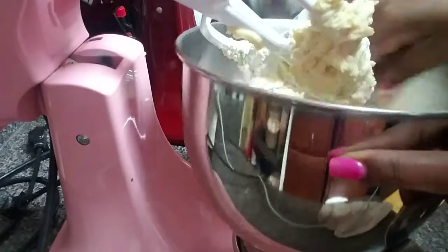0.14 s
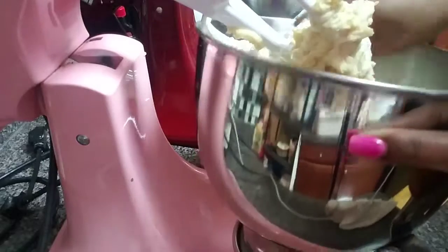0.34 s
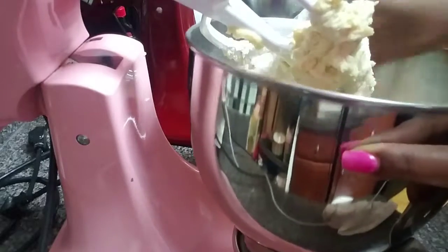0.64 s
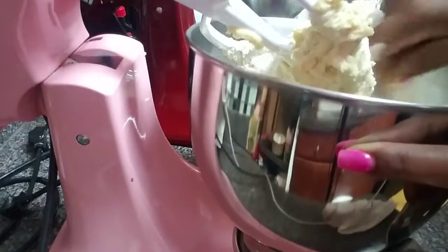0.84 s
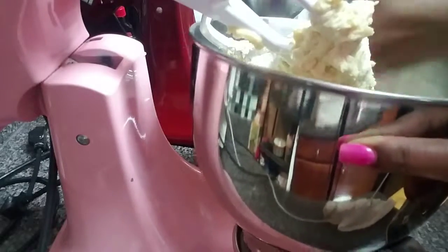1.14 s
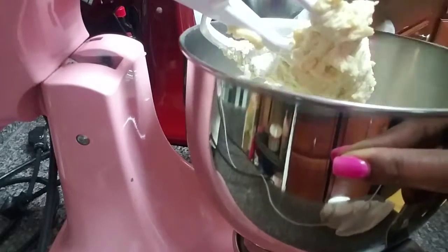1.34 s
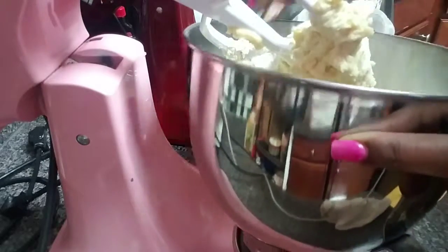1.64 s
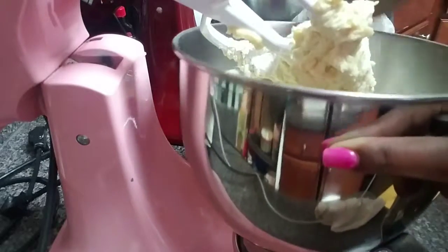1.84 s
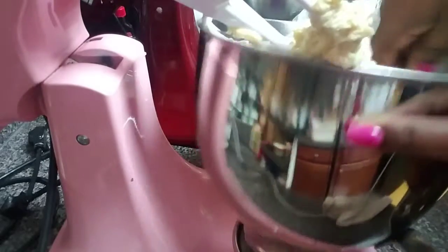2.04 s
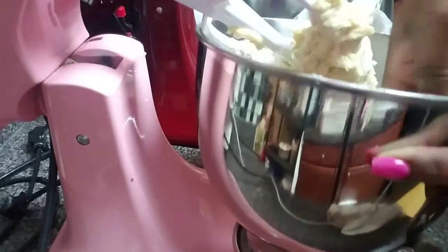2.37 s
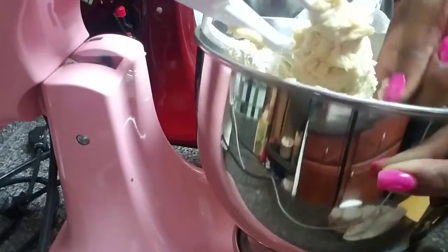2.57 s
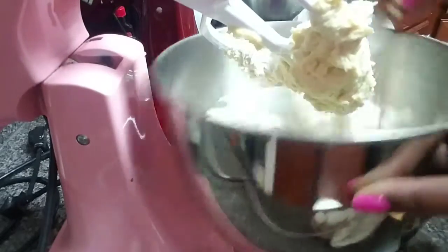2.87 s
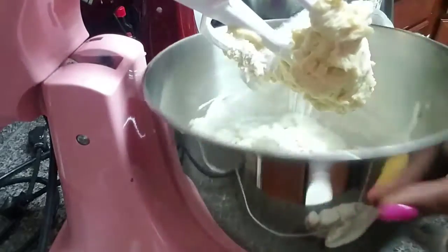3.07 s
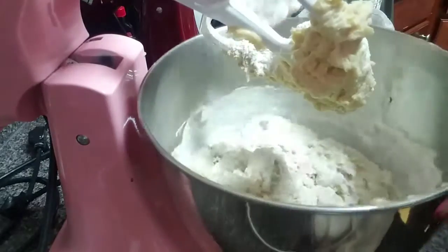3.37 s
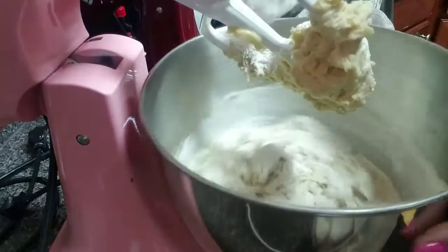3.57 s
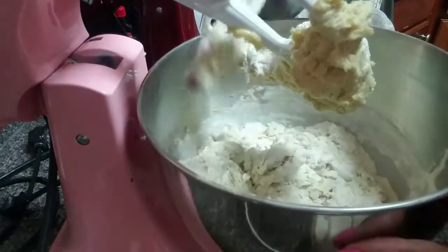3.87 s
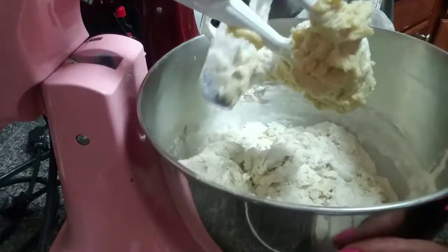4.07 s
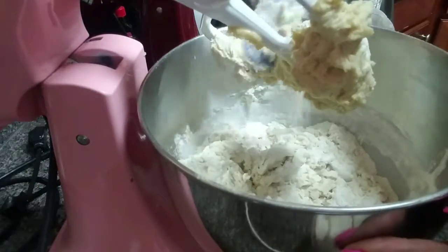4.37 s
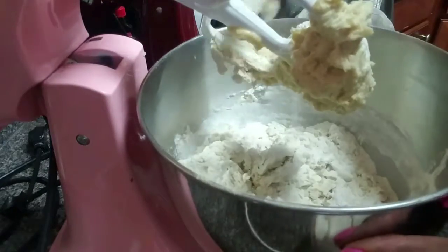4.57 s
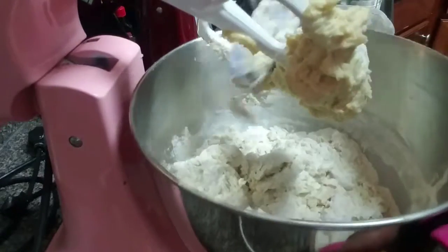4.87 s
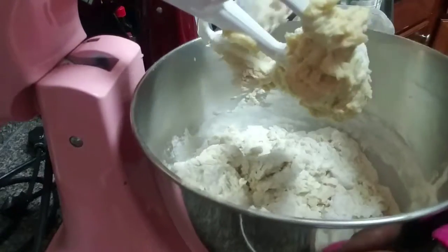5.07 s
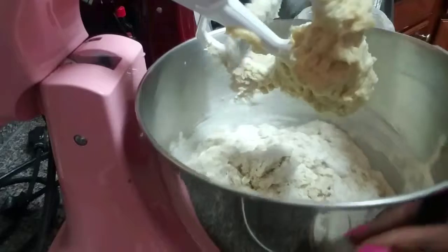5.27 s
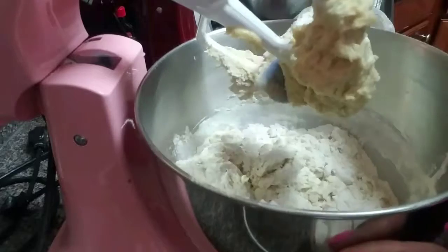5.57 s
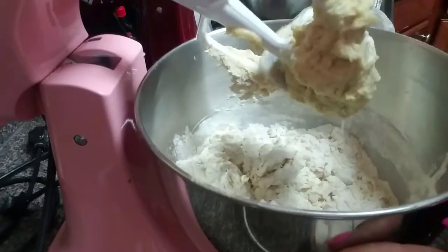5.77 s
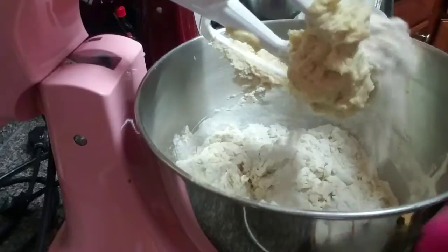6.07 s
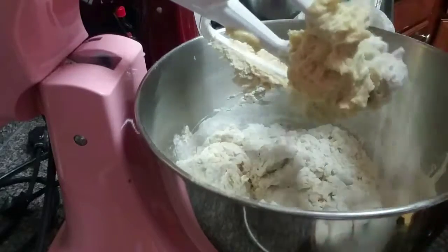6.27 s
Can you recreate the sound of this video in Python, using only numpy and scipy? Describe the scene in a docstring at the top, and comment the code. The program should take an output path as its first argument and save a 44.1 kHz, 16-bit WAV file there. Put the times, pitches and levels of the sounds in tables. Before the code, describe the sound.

Sparse light knocks and bright clinks on a hand-damped steel bowl come first, with short gritty swishes of flour. Around the middle the bowl shifts in its seat, thudding heavily and repeatedly against a hollow stand, with short metal rings and low rumble. Afterward only gentle dough drags, tiny taps and one moderate double knock remain, heard close in a small, slightly reverberant kitchen.

```python
"""Spatula in a steel bowl

A spatula knocks and scrapes in a steel bowl that sits on a hollow mixer stand in a small kitchen.
Knocks and clangs are sums of decaying modes of stand, seat and wall, with noise bursts at contact.
Creaks and pings ring a few modes as the bowl is tilted; crumbs tick into the damped wall.
Flour and dough swish as the spatula strokes or the bowl bumps and slides; with the rumble of the
stand and the room air, these are noise shaped in half-octave bands.
"""
import sys
import numpy as np
from scipy import signal
from scipy.fft import rfft, irfft, next_fast_len
from scipy.io import wavfile

SR = 44100
rng = np.random.default_rng(int(sys.argv[2]) if len(sys.argv) > 2 else 0)


def ratio_of_db(decibels):
    """Turn decibels (scalar or array-like) into linear amplitude factors; 0 dB maps to 1."""
    return 10 ** (np.asarray(decibels, float) / 20)


def to_wav(sig):
    """Store sig (one row per channel, or 1-D mono) as 16-bit WAV at the path in sys.argv[1].

    Samples outside -1..1 are clipped; the rate is SR.
    """
    pcm = np.clip(np.atleast_2d(sig), -1, 1) * 32767
    pcm = np.round(pcm).astype(np.int16)
    wavfile.write(sys.argv[1], SR, pcm.T)  # frames by channels


N = 283122  # length in samples

# bumps that shake the stand: (t/s, level/dB, pitch favoured by the struck spot f/Hz,
# knuckle part relative level/dB, treble part relative level/dB)
STAND_KNOCKS = [(0.112, -44, 215, -6, -7), (0.246, -54, 285, 4, -20), (0.363, -23, 497, -1, 0),
                (1.339, -35, 273, -7, -30), (1.543, -34.5, 220, -13, -46), (2.107, -16.5, 570, 0.5, 1.5),
                (2.112, -22.5, 323, -21, -13), (2.31, -27.5, 140, -11, -22), (2.388, -35, 144.6, -12, -19),
                (2.548, -25.5, 283, -5, -34), (2.724, -30, 240, -3.5, -23), (2.942, -34, 274, -3, -11),
                (2.961, -20, 554, -20, -14), (2.968, -5.5, 205, -18, -16.5), (3.011, -9.5, 229, -12, -14),
                (3.084, -20, 228.5, -6, -22), (3.099, -16, 242, -22, -12), (3.163, -22, 254, -11.5, -28),
                (3.225, -4.5, 220.8, -25, -22), (3.248, -8.5, 363, -24.5, -26),
                (3.306, -7.5, 216, -21.5, -15), (3.333, -8, 379, -13, -25), (3.398, -29.5, 380, 0, -16),
                (3.456, -22, 372, -14, -24.5), (3.562, -32.5, 276, -27, -31), (3.64, -12, 414, -19, -18.5),
                (3.645, -10, 257, -26, -22.5), (3.669, -10.5, 286, -23, -13.5), (3.688, -9.5, 537, -9, -19),
                (3.752, -11, 522, -9, -19), (3.763, -13, 369, -18, -22), (3.789, -25.5, 373, -27, -35),
                (3.865, -38.5, 381, -19, -31), (4.075, -49.5, 310, -16, -25.5),
                (4.448, -51, 262, -22, -24.5), (4.508, -55.5, 148, -4, 3.5), (4.628, -51.5, 253, -19, -16),
                (4.689, -36, 130, -23, -36), (4.893, -31, 270, -16, -25), (5.055, -59.5, 231, -16.5, -24.5),
                (5.12, -41, 266, -8, -23), (5.178, -44, 147, -4, -15), (5.208, -48, 258, -6, -20),
                (5.309, -42, 275, -13, -15), (5.409, -18.5, 361, -39, -19.5), (5.458, -27.5, 248, -24, -31),
                (5.476, -31, 347, -11, -14), (5.488, -21, 213, -11.5, -14), (5.528, -43.5, 132.4, -19, -20),
                (5.92, -30.5, 273, -18, -20), (6.032, -56, 199, -17.5, 1.5), (6.195, -54, 132.8, -12, 0.5)]
THUD_DB, BELOW_DB_PER_OCTAVE, ABOVE_DB_PER_OCTAVE = -0.5, 8.5, 16.5  # fall away from the favoured pitch
KNUCKLE_HZ, KNUCKLE_DB, KNUCKLE_DB_PER_OCTAVE = 820, 3, 23.5  # upper modes, woken by a small hard contact
HARD_DB, HARD_DB_PER_OCTAVE = -2.5, 1  # treble part; its slope above 2 kHz


def knock_levels(hz):
    """Contact spectrum: each knock excites a thud round its favoured pitch, a knuckle and a treble part."""
    s, db, spot_hz, knuckle_db, hard_db = np.transpose(STAND_KNOCKS)[:, :, None]
    hz = np.array(hz)
    octaves = np.log2(hz / spot_hz)
    thud_db = THUD_DB + np.minimum(BELOW_DB_PER_OCTAVE * octaves, -ABOVE_DB_PER_OCTAVE * octaves)
    treble = np.log2(hz / 2000)
    dull_db = -24 * np.maximum(treble + 1, 0)  # the thud falls off above 1 kHz
    knuckle_db = KNUCKLE_DB + knuckle_db - KNUCKLE_DB_PER_OCTAVE * np.abs(np.log2(hz / KNUCKLE_HZ))
    bright_db = HARD_DB + hard_db + np.minimum(12 * treble, HARD_DB_PER_OCTAVE * treble)
    power = ratio_of_db(2 * (thud_db + dull_db)) + ratio_of_db(2 * knuckle_db) + ratio_of_db(2 * bright_db)
    return db + 10 * np.log10(power)


# modes of the hollow stand: (f/Hz, level/dB, decay time t60/s)
STAND_MODES = [(111, -26.5, 0.48), (152.8, -11, 0.16), (207, -14.5, 0.11), (216, -2.5, 0.1),
               (248.3, -3, 0.1), (283, -3.5, 0.1), (320.7, -9, 0.045), (363.8, -2.5, 0.15),
               (422, -13.5, 0.071), (482.8, -7.5, 0.13), (548, -5, 0.076), (567, -7.5, 0.056),
               (645, -6.5, 0.075), (739.5, -11.5, 0.16), (849, -4, 0.059)]


def knocks():
    """Modal superposition: each knock rings the hollow stand and adds a burst of contact noise."""
    pitches_hz = np.geomspace(100, 12800, 29)
    times, levels = np.array(STAND_KNOCKS)[:, 0], knock_levels(pitches_hz)
    free = np.ones(len(times))
    stand = strike(times, levels, free, pitches_hz, STAND_MODES, spread_db=2.0, detune=0.018)
    return stand + crack(times, levels, pitches_hz)


# noise bands of the contact itself: (lower f/Hz, upper f/Hz, level/dB, decay time t60/s)
CONTACT_BANDS = [(114, 573, -7.5, 0.087), (427, 1280, -6.5, 0.02), (1150, 2880, -1, 0.073),
                 (3530, 7700, -3, 0.034), (8800, 14800, -9, 0.0089)]


def crack(times, levels, pitches_hz):
    """Impact noise: every contact adds a short, exponentially dying burst in each band."""
    out = 0
    for low, high, level_db, t60 in CONTACT_BANDS:
        centre = np.log(low * high) / 2
        strength_db = np.array([np.interp(centre, np.log(pitches_hz), row) for row in levels])
        touch = clicks(times, ratio_of_db(strength_db + level_db))
        # the contact spreads over a millisecond
        dying = (ring(touch, 0, t60) - ring(touch, 0, 0.0045)).imag
        noise = band(dying * rng.standard_normal(N), low, high)
        out = out + noise * np.sqrt(SR / 2 / (high - low))
    return out


# metal on metal, the bowl's foot against its seat: (t/s, level/dB)
SEAT_CLANKS = [(2.9638, -27), (2.9695, -15.5), (3.0101, -26.5), (3.0905, -23.5), (3.1003, -27.5),
               (3.2209, -23), (3.25, -31), (3.3056, -31), (3.333, -45), (3.5637, -50), (3.6405, -34),
               (3.691, -32)]
# modes of the seat: (f/Hz, relative level/dB, decay time t60/s)
SEAT_MODES = [(1355, -9.5, 0.096), (1380, -3.5, 0.18), (1823, -11.5, 0.18), (1990, -9, 0.1),
              (2034, -7, 0.15), (3800, -21, 0.22), (4000, -32.5, 0.13), (5450, -20.5, 0.11)]


def clanks():
    """Impact excitation: the bowl's foot strikes its seat and rings the seat's modes."""
    times, level_db = np.transpose(SEAT_CLANKS)
    free = np.ones(len(times))
    return strike(times, level_db[:, None], free, [2000], SEAT_MODES, spread_db=2.5, detune=0.0038)


# strikes that leave the wall ringing: (t/s, low ring level/dB, high ring level/dB, share of free ring time)
WALL_STRIKES = [(0.111, -48, -68, 0.87), (0.364, -19, -20.5, 0.4), (1.339, -51.5, -71, 1),
                (2.107, -22.5, -19, 0.64), (2.549, -39.5, -63, 0.56), (2.724, -35, -59, 0.46),
                (2.971, -18.5, -45, 0.76), (3.009, -40.5, -71, 0.76), (3.089, -27, -39.5, 0.43),
                (3.304, -26, -34, 0.57), (4.508, -48.5, -58, 0.89), (5.123, -42, -80.5, 0.33),
                (5.312, -47, -66, 0.56)]
# modes of the free bowl wall: (f/Hz, relative level/dB, free decay time t60/s)
WALL_MODES = [(453, -13.5, 0.15), (620, -10.5, 0.095), (845, -6, 0.15), (1177, -14.5, 0.25),
              (1301, -3, 0.11), (1590, -24.5, 1.3), (1618, -7, 0.1), (2376, -8, .15), (2587, -21.5, 0.98),
              (2610, -17, 0.51), (2750, -18, 0.2), (4123, -16, 0.53), (4235, -12.5, 0.28), (4290, -16, .2),
              (4050, -15.5, .3), (4530, 1, 0.081), (4660, -17, 0.213), (5510, -21.5, 0.33),
              (5460, -17, 0.23), (5900, -34, .2), (6630, -14, .15), (7300, -35, 0.27)]


def clangs():
    """Damped shell vibration: the wall rings as long as the hand lets it."""
    times, low_db, high_db, free = np.transpose(WALL_STRIKES)
    levels, free = np.transpose([low_db, high_db]), np.clip(free, .1, 2)
    wall = strike(times, levels, free, [1200, 4000], WALL_MODES, spread_db=0.0, detune=0.0024)
    return wall + ratio_of_db(-5) * crack(times, levels, [500, 4000])


# single modes of the bowl left singing after a contact: (t/s, level/dB, f/Hz, decay time t60/s)
SINGING_MODES = [(2.971, -34.5, 2600, 0.54), (3.09, -42, 2600, 0.33), (3.012, -36.5, 2913, 0.19),
                 (3.223, -34, 2916, 0.17), (3.40, -50.5, 2397, 0.38), (5.491, -42.5, 2430, 0.19),
                 (6.035, -58, 4050, 0.39)]


def pings():
    """Free oscillation: one lightly damped mode of the bowl sings on after a contact."""
    return sum(ring(clicks([s], ratio_of_db(db)), hz, t60).real for s, db, hz, t60 in SINGING_MODES)


# slips of the bowl in its seat: (t/s, relative level/dB)
SEAT_SLIPS = [(2.8522, -49.5), (2.8736, -47), (2.89, -44.5), (2.9196, -41)]
# modes that a slip rings: (f/Hz, relative level/dB, decay time t60/s)
SLIP_MODES = [(817, -10, 0.11), (1154, -0.5, 0.043), (3140, -11, 0.02), (4100, -12, 0.025),
              (5760, -8.5, 0.0053)]


def creaks():
    """Slip excitation: each slip of the bowl in its seat is an impulse that rings a few modes."""
    times, levels = np.transpose(SEAT_SLIPS)
    return sum(ring(clicks(times, ratio_of_db(levels + db + 4)), hz, t60).real for hz, db, t60 in SLIP_MODES)


# swishes of flour and dough, from spatula strokes or from the bowl bumping and sliding:
# (middle t/s, length t/s, flour hiss level/dB, dough drag level/dB)
SWISHES = [(0.092, 0.17, -64.5, -68), (0.237, 0.1, -57, -68), (0.608, 0.09, -57.5, -67),
           (0.717, 0.11, -68.5, -66.5), (0.967, 0.11, -66, -85), (1.287, 0.092, -65.5, -80),
           (1.789, 0.076, -57.5, -66), (1.913, 0.23, -55, -58.5), (2.177, 0.2, -53, -60),
           (2.372, 0.096, -55, -60), (2.548, 0.23, -57, -64), (2.907, 0.14, -67, -64.5),
           (3.026, 0.11, -51.5, -48.5), (3.172, 0.15, -59, -55), (3.26, 0.056, -50.5, -45),
           (3.334, 0.051, -46, -42), (3.5, 0.52, -65, -66.5), (3.706, 0.13, -53.5, -52.5),
           (4.21, 0.14, -80, -68), (4.646, 0.051, -82, -69), (4.781, 0.11, -75, -63),
           (5.16, 0.11, -75.5, -65.5), (5.297, .12, -70.5, -63), (5.504, 0.14, -63.5, -61),
           (6.006, .3, -77.5, -68.5), (6.366, 0.11, -70, -64.5)]
SWISH_SQUARENESS = 2.6  # 2 = bell, higher = flat top with steep ends
REST_FLOUR_DB, REST_DRAG_DB = -79, -81.5  # hiss and drag never quite stop


def swishes():
    """Power addition: swishes that swell, hold and fade alike set the hiss and drag levels in dB."""
    t, power = np.arange(N) / SR, ratio_of_db(2 * np.array([[REST_FLOUR_DB], [REST_DRAG_DB]]))
    for middle, length, *db in SWISHES:
        shape = np.exp(-np.abs(2 * (t - middle) / length) ** SWISH_SQUARENESS)
        power = power + ratio_of_db(2 * np.array(db))[:, None] * shape
    return 10 * np.log10(power)


def crumbs(drag_db):
    """Random impulse excitation: crumbs caught in clumps tick into the middle modes of the damped wall."""
    caught = rng.random(N) < 120 * ratio_of_db(6 * drift(25)) / SR  # median 120 per second
    size = ratio_of_db(4.5 * np.minimum(rng.exponential(1, N), 4))
    ticks = caught * size * rng.choice([-1, 1], N)
    wall = sum(ring(ticks + 1e-18, hz, .03).real for hz, db, t60 in WALL_MODES[2:13])
    return ratio_of_db(drag_db - 2.5) * rms_one(wall)


# spectrum of flour along the steel: (f/Hz, relative density level/dB per Hz)
FLOUR_SPECTRUM = [(1760, -36), (3000, -16), (4940, -6), (6480, 0), (9830, -6), (14000, -8), (14900, -2),
                  (15200, -39), (15800, -58.5)]


def flour(level_db):
    """Friction noise: flour hisses along the steel, grainy and bright, with the swishes."""
    return ratio_of_db(level_db) * banded_noise(FLOUR_SPECTRUM, patchy_db=2.6, grain_db=3.0)


# spectrum of the drag in the dough: (f/Hz, relative density level/dB per Hz)
DRAG_SPECTRUM = [(470, -49), (800, 2), (955, -11), (1260, -3), (1410, -3.5), (2500, -2), (6000, -19.5),
                 (7800, -60), (13200, -120)]


def drag(level_db):
    """Friction noise: the drag in the dough follows the swishes, strongest in the middle band."""
    return ratio_of_db(level_db) * banded_noise(DRAG_SPECTRUM, patchy_db=2.5, grain_db=4.0)


# the hand's load on the bowl, as rumble of the stand: (t/s, level/dB)
HAND_LOAD = [(0.0, -61.5), (0.36, -59.5), (1.14, -69.5), (2.31, -53.5), (2.65, -67), (2.98, -45.5),
             (3.16, -38.5), (3.74, -56.5), (3.93, -63.5), (4.31, -65.5), (5.2, -62.5), (5.43, -51.5),
             (5.67, -66), (6.42, -68)]
SHAKE_DB, SHAKE_RISE_S, SHAKE_T60_S = -28, 0.097, 0.4  # rise is the t60 of the subtracted decay


def shaking():
    """Envelope superposition: the load of the hand plus a shudder of the stand after each knock."""
    times, levels = np.array(STAND_KNOCKS)[:, :2].T
    touch = clicks(times, ratio_of_db(levels + SHAKE_DB))
    shudder = (ring(touch, 0, SHAKE_RISE_S) - ring(touch, 0, SHAKE_T60_S)).imag
    load_s, load_db = np.transpose(HAND_LOAD)
    return ratio_of_db(np.interp(np.arange(N) / SR, load_s, load_db)) + shudder


# spectrum of the stand's rumble: (f/Hz, relative density level/dB per Hz)
RUMBLE_SPECTRUM = [(24, -51), (40, -12), (144, -1.5), (181, -4.5), (258, -0.5), (401, -5.5), (772, -14.5),
                   (1200, -32.5), (1560, -65), (2640, -120)]


def rumble():
    """Amplitude modulation: low noise of the stand follows the hand's load and the shudders."""
    return shaking() * banded_noise(RUMBLE_SPECTRUM, patchy_db=2.5, grain_db=3.0)


# spectrum of the room air: (f/Hz, relative density level/dB per Hz)
AIR_SPECTRUM = [(12, -30), (20, -13.5), (44, 1.5), (220, -2.5), (396, -19.5), (818, -15), (967, -18),
                (2430, -21.5), (4880, -29), (7420, -26), (9270, -51.5), (14100, -16.5), (15800, -49)]


def air():
    """Stationary background noise: room air at a nearly even level."""
    return ratio_of_db(-63) * banded_noise(AIR_SPECTRUM, patchy_db=.3, grain_db=0)


# level of the left port over the right: (f/Hz, level/dB)
PORT_LEAN = [(60, -6), (110, 1), (200, -0.5), (380, -1), (700, -3.5), (1290, -3), (2380, -2.5), (4400, -4),
             (8120, -5), (15000, 2)]
# phase by which the left port leads the right: (f/Hz, phase/rad)
PORT_LEAD = [(20, -1.9), (250, 0.46), (500, 0.79), (900, 1.55), (1460, 1.54), (2070, 1.46), (3100, 1.44),
             (4500, 1.47), (8000, 2.12), (14000, 1.4)]


def ports(x):
    """Interaural-style transfer: two microphone ports hear a near source with their own level and phase."""
    size = next_fast_len(N + 4096)
    hz = np.maximum(np.fft.rfftfreq(size, 1 / SR), 1)
    half = ratio_of_db(at_hz(PORT_LEAN, hz) / 2) * np.exp(.5j * at_hz(PORT_LEAD, hz))
    return irfft(rfft(x, size) * np.array([half, 1 / half]), size)[:, :N]


# reverberation time of the kitchen: (f/Hz, t60/s)
REVERBERATION = [(150, 0.26), (600, 0.26), (2500, 0.51), (10000, 0.39)]


def room(x):
    """Diffuse reverberation: convolution with a dense noise tail that dies band by band."""
    t, tail = np.arange(SR * 3 // 4) / SR, 0
    edges = 60 * 2 ** np.arange(9.)
    for low, high in zip(edges, edges[1:]):
        hz = np.sqrt(low * high)
        decay = ratio_of_db(-60 * t / at_hz(REVERBERATION, hz)) * (t > .004)
        mid, side = band(rng.standard_normal((2, len(t))), low, high) * decay
        tail = tail + stereo(mid, side, hz)
    return signal.fftconvolve(x[None], tail / np.sqrt(np.sum(tail ** 2) / 2), axes=1)[:, :N]


# likeness of diffuse sound at the two ports: (f/Hz, left-right likeness)
PORT_LIKENESS = [(60, 0.92), (240, 0.88), (950, 0.12), (3770, 0), (15000, 0.042)]


def stereo(mid, side, hz):
    """Spatial coherence: independent mid and side noises are mixed to the likeness at this pitch."""
    alike = np.clip(at_hz(PORT_LIKENESS, hz), 0, 1)
    return np.sqrt(1 + alike) * mid + np.sqrt(1 - alike) * side * [[1], [-1]]


def banded_noise(spectrum, patchy_db, grain_db):
    """Band synthesis: half-octave stereo noises, each with its own level, flicker and likeness; rms 1."""
    out, together = 0, drift(3.9)
    edges = 20 * 2 ** np.arange(0, 10.1, .5)
    white = rng.standard_normal((2, 2, N)) * ratio_of_db(grain_db * np.minimum(rng.exponential(1, N), 4))
    shaped = np.array(spectrum)[:, 0]
    for k, (low, high) in enumerate(zip(edges, edges[1:])):
        if high > shaped[0] and low < shaped[-1]:
            hz = np.sqrt(low * high)
            mid, side = band(white[k % 2], low, high)
            gain = ratio_of_db(at_hz(spectrum, hz) + patchy_db * (.7 * together + drift(15)))
            out = out + gain * stereo(mid, side, hz)
    return rms_one(out)


def strike(times, levels, free, pitches_hz, modes, spread_db, detune):
    """Modal synthesis: each blow has its own mode strengths; hand and dough damp and detune the ring."""
    hz, level_db, t60 = np.transpose(modes)[:, :, None]
    chance, out = rng.standard_normal((len(times), 3, len(modes), 1)), np.zeros(N + SR)
    for start, row, share, (size, sign, shift) in zip(times, levels, free, chance):
        t = np.arange(int(min(np.max(t60) * share, 1) * SR)) / SR
        struck_db = np.interp(np.log(hz), np.log(pitches_hz), row)
        height = ratio_of_db(struck_db + level_db + spread_db * size) * np.sign(sign)
        swell = 1 - np.exp(-1.5 * hz * t)  # energy enters over about a cycle: low modes swell later
        decay = ratio_of_db(-60 * t / (t60 * share))
        ringing = height * swell * decay * np.sin(2 * np.pi * hz * (1 + detune * shift) * t)
        out[round(start * SR):][:len(t)] += ringing.sum(axis=0)
    return out[:N]


def ring(x, hz, t60):
    """Damped resonator: a unit click rings a sine of height 1, as a turning arrow (complex phasor)."""
    return -1j * signal.lfilter([1], [1, -ratio_of_db(-60 / (t60 * SR)) * np.exp(2j * np.pi * hz / SR)], x)


def clicks(times, sizes):
    """Impulse excitation at the given seconds."""
    out = np.full(N, 1e-18)
    np.add.at(out, np.round(np.array(times) * SR).astype(int), sizes)
    return out


def drift(rate_hz):
    """Low-passed random fluctuation: slow chance of spread 1, drawn 100 times a second."""
    knots = rng.standard_normal(int(N / SR * 100) + 2)
    r = np.exp(-2 * np.pi * rate_hz / 100)
    slow = rms_one(signal.lfilter([1], [1, -r], knots))
    return np.interp(np.arange(N) / SR * 100, np.arange(len(knots)), slow)


def band(x, low_hz, high_hz):
    """Band-pass filtering with a Butterworth response."""
    return signal.sosfilt(signal.butter(2, [low_hz, min(high_hz, .45 * SR)], "band", fs=SR, output="sos"), x)


def at_hz(points, hz):
    """Interpolation of a table on a logarithmic frequency axis."""
    table = np.array(points)
    return np.interp(np.log(hz), np.log(np.maximum(table[:, 0], 1)), table[:, 1])


def rms_one(x):
    """Power normalisation: scale to unit mean square."""
    return x / np.sqrt(np.mean(x ** 2) + 1e-20)


def scene():
    """Superposition: blows reach the ports directly and by the room, over swishes, rumble and air."""
    flour_db, drag_db = swishes()
    blows = knocks() + clanks() + clangs() + pings() + creaks() + crumbs(drag_db)
    direct, reverberant = ports(blows), ratio_of_db(-13) * room(blows)
    return direct + reverberant + flour(flour_db) + drag(drag_db) + rumble() + air()


def low_pass(x):
    """Removes everything above the highest recorded frequency."""
    return signal.sosfilt(signal.butter(12, 15910, fs=SR, output="sos"), x)


PORT_HZ, PORT_WIDTH_HZ, PORT_DB = 14050, 3100, 6.5  # resonance added to the plain sound
TOP_HZ = 14650  # edge of the top cut


def record(dry):
    """Port resonance: a small stereo microphone peaks just under a steep elliptic top cut."""
    peak = signal.lfilter(*signal.iirpeak(PORT_HZ, PORT_HZ / PORT_WIDTH_HZ, fs=SR), dry)
    top_cut = signal.ellip(6, .5, 22, TOP_HZ, fs=SR, output="sos")
    mix = signal.sosfilt(top_cut, dry + ratio_of_db(PORT_DB) * peak)
    return low_pass(mix)


dry = scene()
out = record(dry)
to_wav(out)
```